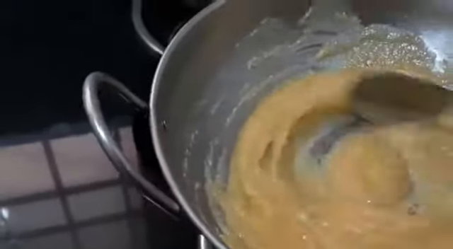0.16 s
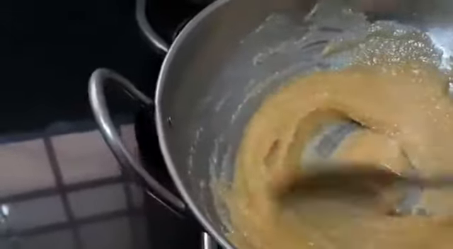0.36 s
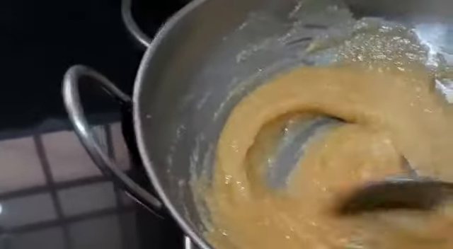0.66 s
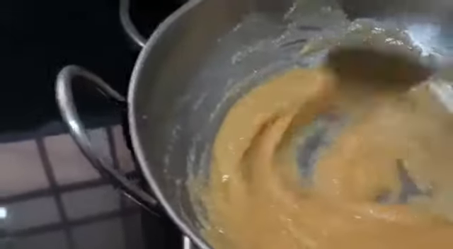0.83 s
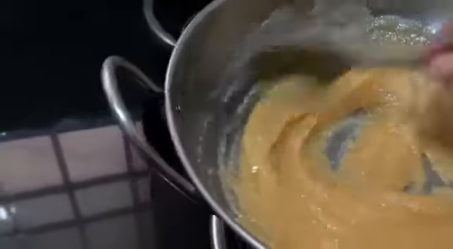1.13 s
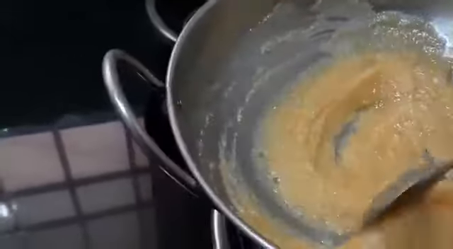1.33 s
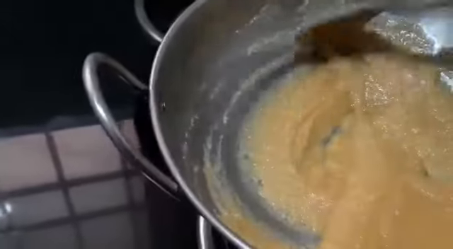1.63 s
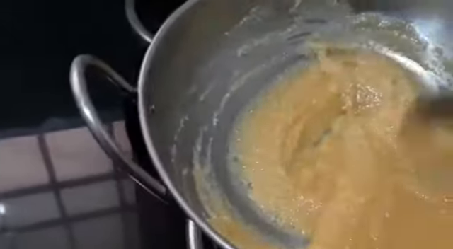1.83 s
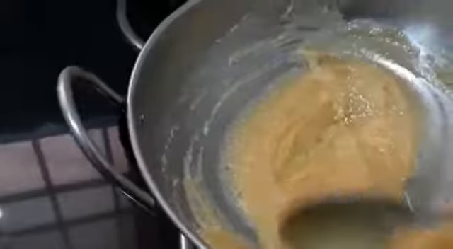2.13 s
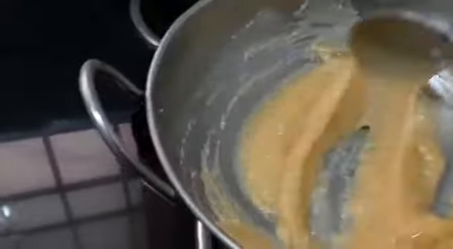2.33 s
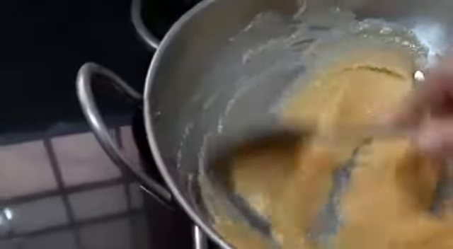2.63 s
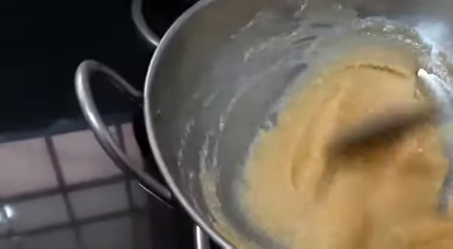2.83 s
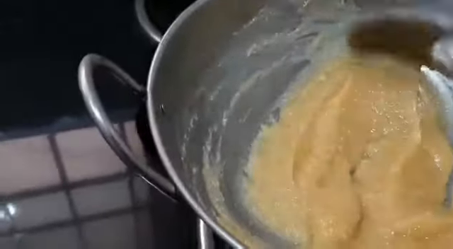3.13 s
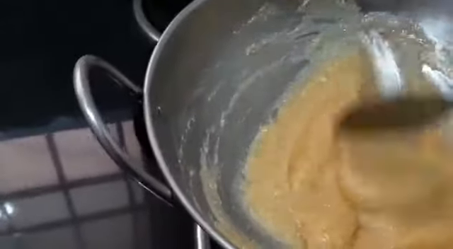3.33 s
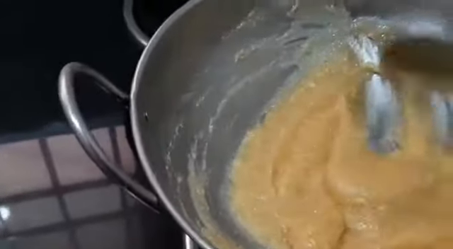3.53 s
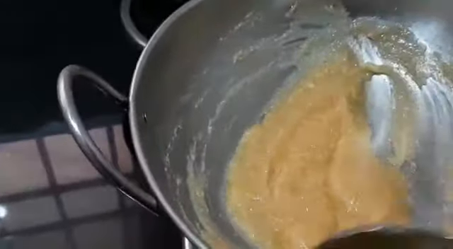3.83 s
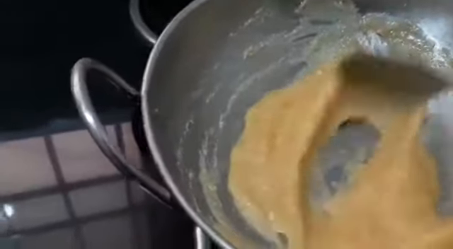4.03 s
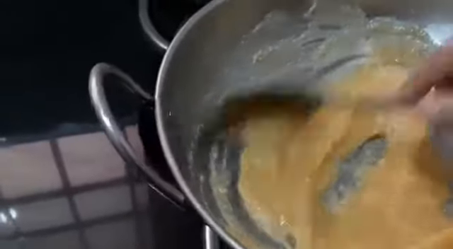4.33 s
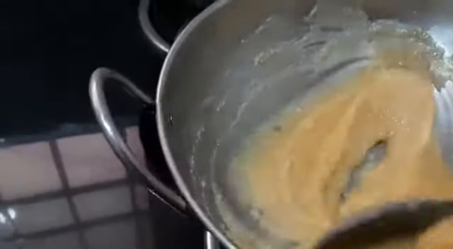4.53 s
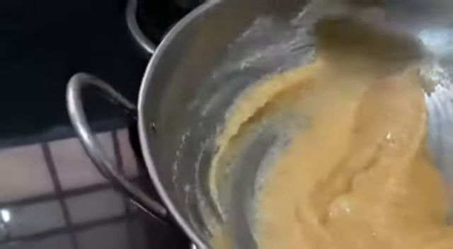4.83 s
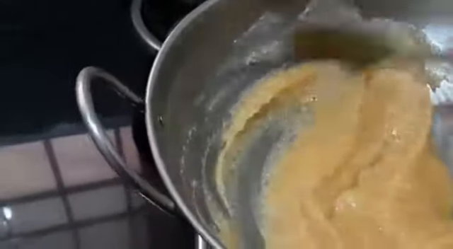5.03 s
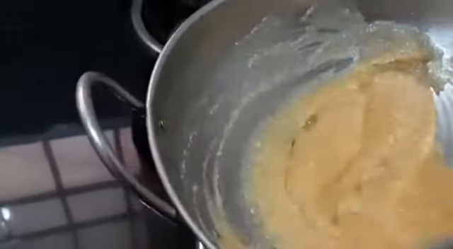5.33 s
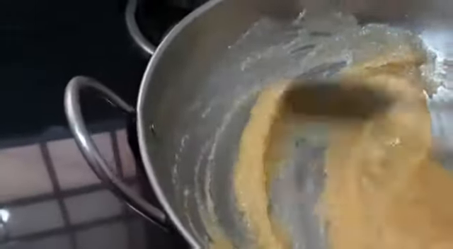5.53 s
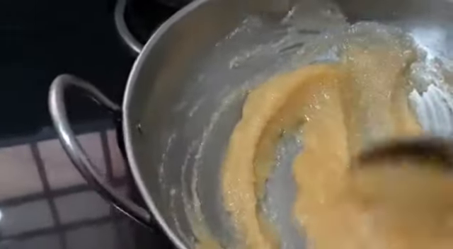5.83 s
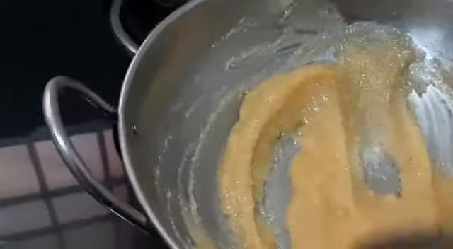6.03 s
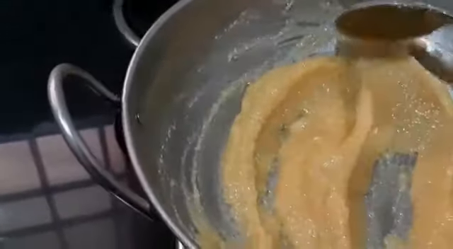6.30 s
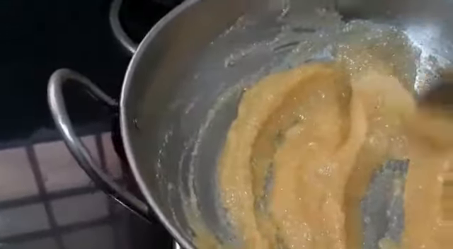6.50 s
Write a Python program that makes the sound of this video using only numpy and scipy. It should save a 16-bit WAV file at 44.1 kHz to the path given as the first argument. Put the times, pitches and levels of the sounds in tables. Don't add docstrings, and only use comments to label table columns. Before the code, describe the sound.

In a hard-walled kitchen, a handheld microphone sits close to a steel pan of thick paste. From 0 to 0.8 seconds a metal spoon scrapes the damped wall in overlapping strokes, gritty hiss over coarse grinding. A soft clack comes at 1.0, then light rubbing, a thin wet slide of paste from about 1.3 to 1.6, and a knock at 1.6. A much harder clack at 2.1 rings the bowl and jolts the microphone. Landings continue at about 2.4, 3.1, 3.5, 3.9, 4.2, 4.6, 5.0, 5.4, 5.7, 6.0 and 6.35, strong ones bright and metallic, weak ones dull and barely heard. Hard ones skid on in a short rasp and shudder the pan on its grate; brief scrapes fill the gaps, the last near 6.5. Low hand bumps surface around 3 and 4.7 seconds. Short echoes and a half-second room tail surround everything, over faint hiss.

```python
import sys
import numpy as np
from scipy import signal
from scipy.fft import rfft, irfft
from scipy.io import wavfile
from scipy.ndimage import uniform_filter1d

SR = 44100
rng = np.random.default_rng(int(sys.argv[2]) if len(sys.argv) > 2 else 0)


def inscribe(sig):
    pcm = np.round(np.clip(np.atleast_2d(sig).T, -1, 1) * 32767)
    wavfile.write(sys.argv[1], SR, pcm.astype(np.int16))


def invert_db(level):
    return 10 ** (np.asarray(level, dtype=float) / 20)


N = 293706
TIME_S = np.arange(N) / SR

# start_s, peak_db, dull_knock_db, bright_tick_db, bowl_pitch_hz
LANDINGS = [(1.005, -28.5, -7.5, -25, 1625), (1.616, -23, -6, -18, 2800), (2.104, -14, -9, -5.5, 2460),
            (2.435, -26.5, 0, -12.5, 1550), (3.055, -25, -9.5, -22, 1790), (3.47, -13.5, -8, -15, 1670),
            (3.869, -12.5, -8.5, -3.5, 2460), (4.198, -41, -2, -9, 1530), (4.621, -9.5, -19.5, -15, 1850),
            (4.963, -35, -24, -29, 1530), (5.388, -10, -19, -5.5, 2640), (5.691, -47.5, 14.5, -11, 1490),
            (6.001, -40.5, -5, -22, 1550), (6.016, -10.5, -13, -4, 2790),
            (6.351, -15.5, -12.5, -30.5, 1820)]
# start_s, peak_db
LIGHT_TICKS = [
    (2.987, -69),
    (5.975, -70),
]
# pitch_hz, level_db, t60_s
SPOON_MODES = [(5230, -13, 0.033), (5870, 10.5, 0.0012), (7000, -25, 0.0089), (8830, -2, 0.0095),
               (10830, -6, 0.011)]
# multiple_of_bowl_pitch, level_db_per_hz
BOWL_CLACK = [(0.099, -48.5), (.4, -22.5), (0.651, -5.5), (1.002, 8), (1.25, -3.5), (1.7, -9.5),
              (2.6, -25.5)]
# pitch_hz, level_db_per_hz
EDGE_TICK = [(1880, -4), (3200, -19), (3650, -8), (5210, -3.5), (7240, -2), (8600, -0.5), (14700, -9.5),
             (15700, -9.5), (16500, -100)]
# pitch_hz, level_db_per_hz
DULL_KNOCK = [(200, -34), (450, 1), (900, 1), (1600, -2.5), (2200, -7.5), (3500, -45)]


def knocks():
    near, sent = np.zeros(N + SR), np.zeros(N + SR)
    t = np.arange(3000) / SR
    click = 1. * (t == 0)
    blows = [(*row, -1.5 + 0.24 * row[1]) for row in LANDINGS]
    blows += [(*row, -30, 10.5, 6500, -10) for row in LIGHT_TICKS]
    for start_s, peak_db, dull_db, tick_db, bowl_hz, send_db in blows:
        level_spread, pitch_spread = rng.standard_normal((2, len(SPOON_MODES)))
        metal = [(hz, db + 2.0 * u, t60) for (hz, db, t60), u in zip(SPOON_MODES, level_spread)]
        bowl_clack = [(multiple * bowl_hz, db) for multiple, db in BOWL_CLACK]
        blow = invert_db(tick_db - 1) * ring(metal, t, 1 + .03 * pitch_spread)
        blow += ring([(bowl_hz, -18, .025)], t, [1])
        blow += invert_db(9.5) * colour(click, bowl_clack)
        blow += invert_db(tick_db + 20) * colour(click, [(300, -63.0)] + list(EDGE_TICK))
        blow += invert_db(dull_db + 17) * colour(click, DULL_KNOCK)
        chatter = rng.standard_normal(200) * invert_db(-20 - 60 * t[:200] / 0.0063)
        contacts = np.cumsum(rng.integers(5, 36, 5))
        chatter[contacts] = rng.choice([-1, 1], 5) * invert_db(np.array([-4, 2, -7, -9, -12]))
        at = round((start_s - .0008) * SR)
        near_gain = invert_db(peak_db - 1.5 + 0.1349 * peak_db)
        near[at:at + 3000] += near_gain * signal.oaconvolve(blow, chatter)[:3000]
        sent[at:at + 3000] += invert_db(peak_db + send_db) * blow
    return near[:N], sent[:N]


# hardest_moment_s, pressure_db, rise_s, fall_s, bite_into_bare_steel_db
PUSHES = [(0.0, -31, .05, 0.21, 3.5), (.135, -34, 0.09, .12, 2), (.29, -29.5, 0.15, 0.48, 4.5),
          (.47, -27.5, 0.16, 0.094, 0), (0.637, -30.5, 0.15, 0.039, 3.5), (.72, -37, 0.047, 0.12, 5),
          (0.773, -28, 0.076, 0.026, 3), (1.09, -40.5, 0.06, 0.073, 0.5), (1.26, -33, 0.076, 0.047, 2),
          (1.732, -35.5, .12, 0.19, 1.5), (1.831, -30, 0.026, 0.1, 0), (2.521, -58, 0.12, .15, -3),
          (2.608, -32, 0.11, 0.15, -0.5), (3.155, -38.5, 0.087, 0.082, 2.5), (3.195, -33, 0.1, 0.1, 1.5),
          (3.592, -26.5, 0.078, 0.093, -1), (4.298, -31, 0.13, 0.17, 0.5), (5.02, -38.5, .06, 0.083, 1),
          (5.14, -31, 0.042, 0.023, 1), (5.758, -32.5, 0.06, 0.12, 0), (6.449, -34.5, 0.086, 0.021, -0.5),
          (6.543, -32.5, 0.091, 0.11, -1)]


def pressure():
    return swells(*np.transpose(PUSHES)[:4])


# pitch_hz, width_hz, level_db
PAN_WALL = [(531, 260, -11), (810, 250, -18.5), (4300, 67, -2.5), (5317, 95, -6.5), (6295, 66, -10),
            (6680, 92, -12), (8000, 180, -15.5), (9700, 130, -26.5), (12230, 110, -4)]
# start_s, pitch_hz
EDGE_PLACE = [(0, 1570), (.14, 1706), (0.248, 1300), (.5, 1620), (0.701, 1270), (1.1, 1640), (1.24, 1280),
              (1.7, 1620), (1.849, 1477), (2.6, 1540), (3.131, 1613), (3.6, 1326), (4.3, 1570),
              (5.14, 1370), (5.45, 1480), (5.72, 694), (5.88, 683), (6.051, 1597)]
# pitch_hz, level_db_per_hz
GRIT_HISS = [(1880, -49), (3200, -5), (4420, -2), (4760, -3), (5170, -2.5), (7240, -3.5), (8480, 1),
             (9400, -3.5), (13300, -4), (15900, -10.5), (16500, -55)]
# pitch_hz, level_db_per_hz
GRIT_GRIND = [(240, -36.5), (400, -9.5), (588, -3.5), (1060, -6.5), (1260, -1.5), (1450, -4.5),
              (2200, -4.5), (2860, -13), (4840, -120)]
# pitch_hz, level_db_per_hz
RUBBED_BOWL = [(1120, -26.5), (1900, -1), (2190, -1), (2410, -2.5), (2700, -3.5), (3400, -7.5), (4420, -4),
               (7480, -120)]
# start_s, hiss_db, grind_db, bowl_db
EDGE_SKIDS = [(0.091, -27.5, -36, -28), (0.688, -29, -35, -35), (1.217, -36, -40, -49),
              (1.008, -49.5, -43.5, -48), (1.621, -49, -37.5, -38), (2.11, -25.5, -26.5, -23),
              (2.438, -48.5, -40, -46.5), (3.058, -60, -41.5, -43.5), (3.474, -36.5, -35, -33),
              (3.876, -23.5, -25.5, -22.5), (4.203, -60, -49.5, -48), (4.624, -36, -29.5, -24),
              (4.967, -55, -59, -54), (5.395, -24, -28.5, -22.5), (5.697, -52, -46, -63),
              (6.022, -26.5, -27.5, -23), (6.355, -48, -35.5, -41)]
# fall_s of hiss, grind, bowl
SKID_FALLS = [0.19, .23, 0.17]


def scrape(push):
    slip_size = invert_db(5.1 * np.minimum(rng.exponential(1, N), 4.4))
    slips = slip_size * (rng.random(N) < 3000 / SR) * rng.choice([-1, 1], N)
    grit = evened(evened(slips) + 0.61 * rng.standard_normal(N))
    judder = invert_db(2.2 * drift(60, count=1)[0])
    grit = evened(grit * judder)
    travel = 3.5 * np.array(drift(12, count=len(PAN_WALL)))
    rings = []
    for (hz, width, db), level_db, bend in zip(PAN_WALL, travel, travel[::-1]):
        rings.append(invert_db(db + level_db) * resonate(grit, hz * (1 + 0.0068 * bend), width))

    hiss = evened(colour(grit + invert_db(6.5) * sum(rings[2:]), [(300, -83)] + list(GRIT_HISS)))
    place_hz = np.interp(TIME_S, *np.transpose(EDGE_PLACE))
    moving = invert_db(6.0) * resonate(grit, place_hz, 170)
    grind = evened(colour(grit + invert_db(9.0) * sum(rings[:2]) + moving, GRIT_GRIND))
    bowl = evened(colour(grit, RUBBED_BOWL))

    bite_db = np.interp(TIME_S, *np.transpose(PUSHES)[[0, 4]])
    grind_db = np.minimum(-19.5 - .45 * 20 * np.log10(push), 14.5) + bite_db
    shares = [1, invert_db(grind_db), invert_db(-9.5 + 2.77 * bite_db)]
    start_s, *levels = np.transpose(EDGE_SKIDS)
    rub = np.zeros(N)
    for layer, share, db, fall_s in zip((hiss, grind, bowl), shares, levels, SKID_FALLS):
        skid = swells(start_s, db, .005, fall_s)
        rub += np.hypot(push * share, skid) * layer
    return invert_db(-4) * rub


# start_s, level_db, centre_hz
PASTE_SLIDE = [
    (1.33, -42, 6100),
    (1.556, -43.5, 6000),
    (1.6, -89, 6000),
    (1.61, -65, 5900),
]


def slide():
    start_s, level_db, centre_hz = np.transpose(PASTE_SLIDE)
    s = np.concatenate([[start_s[0] - .012], start_s, [start_s[-1] + 0.026]])
    db = np.interp(TIME_S, s, np.concatenate([[-105.5], level_db, [-105.5]]))
    hz = np.interp(TIME_S, s, np.concatenate([[6000], centre_hz, [6000]]))
    wet = resonate(resonate(rng.standard_normal(N), hz, 1457), hz, 1400)
    return invert_db(db - 14.0) * evened(wet)


# start_s,
# grate_hum_db, pan_body_db, fall_s
PAN_SHAKES = [(0.0, -66, -68, 0.14), (.87, -53, -112, .25), (1.006, -55, -47, 0.36),
              (1.3, -63, -51.5, 0.099), (1.55, -61, -73, 0.18), (1.618, -42.5, -36, 0.28),
              (2.03, -62.5, -83, 0.13), (2.108, -38, -34.5, 0.27), (2.435, -51.5, -40.5, 0.23),
              (2.971, -52, -74, 0.18), (3.057, -47, -40, 0.2), (3.473, -43, -34, 0.34),
              (3.872, -42, -32.5, 0.24), (4.2, -85, -53, 0.42), (4.624, -41, -44.5, 0.28),
              (4.68, -44, -35.5, 0.21), (5.392, -43, -47, .2), (5.44, -43, -38.5, .22),
              (5.694, -57, -45, 0.16), (6.02, -36.5, -35, 0.23), (6.354, -45.5, -35.5, .2)]
# pitch_hz, width_hz, level_db
GRATE_AND_BODY = [(112.6, 9.8, 0), (222.3, 16.5, -7.5), (277.8, 25, -3.5), (318.8, 13.3, -1),
                  (363, 21, -11), (392.5, 84, -9)]


def shake(push):
    start_s, hum_db, body_db, fall_s = np.transpose(PAN_SHAKES)
    hum_lag_s, body_lag_s = 0.022, .008
    hum_gain = invert_db(-72) + invert_db(-40) * push
    hum_gain += swells(start_s + hum_lag_s, hum_db, hum_lag_s, 1.12 * fall_s)
    body_gain = invert_db(-64.5) + invert_db(-31.5) * push
    body_gain += swells(start_s + body_lag_s, body_db, body_lag_s, fall_s)
    common = rng.standard_normal(N)
    ports = []
    for _ in range(2):
        noise = common + 0.21 * rng.standard_normal(N)
        modes = []
        for hz, width, db in GRATE_AND_BODY:
            mode = resonate(resonate(noise, hz, 2 * width), hz, 2 * width)
            modes.append(invert_db(db) * evened(mode))
        hum, *body = modes
        ports.append(hum_gain * evened(hum) + body_gain * evened(sum(body)))
    return np.array(ports)


def worktop(x, echo_db, fade_db):
    out = np.array([np.roll(x, 2), x])
    for share in turns(0.8947):
        taps = np.zeros((2, 400))
        at = np.arange(8) * 40 + 30 + rng.integers(0, 40, (2, 8))
        echoes = invert_db(echo_db - at * fade_db) * rng.choice([-1, 1], at.shape)
        np.put_along_axis(taps, at, echoes, 1)
        out += signal.oaconvolve((share * x)[None], taps, axes=1)[:, :N]
    return out


# pitch_hz, t60_s
KITCHEN_DECAY = [(60, 0.22), (300, 0.65), (1100, 0.29), (2900, 0.45), (7700, 0.31), (16000, 0.24)]


def kitchen(x):
    out = np.zeros((2, N))
    for share in turns(1.4):
        taps = np.zeros((2, SR // 2))
        at = np.arange(100, SR // 2 - 20, 20)
        at = at + rng.integers(0, 20, (2, len(at)))
        np.put_along_axis(taps, at, rng.choice([-1., 1.], at.shape), 1)
        hz, t, z = signal.stft(taps, SR, nperseg=512)
        same = np.clip(read([(100, 0.53), (300, 0.96), (900, 0.16), (5000, 0.093)], hz), 0, 1)[:, None]
        z = np.array([z[0], same * z[0] + np.sqrt(1 - same ** 2) * z[1]])
        decay = invert_db(-60 * t / read(KITCHEN_DECAY, hz)[:, None])
        tail = signal.istft(z * decay, SR, nperseg=512)[1]
        tail = tail * np.clip((np.arange(tail.shape[1]) / SR - .003) / .012, 0, 1)
        tail = tail / np.linalg.norm(tail[0])
        out += signal.fftconvolve((share * x)[None], tail, axes=1)[:, :N]
    return out


# start_s, level_db, rise_s, fall_s
HAND_BUMPS = [
    (.548, -51, .06, 0.028),
    (2.913, -41, .07, 0.042),
    (3.003, -41, 0.16, 0.08),
    (4.648, -30.5, 0.054, 0.067),
    (4.766, -32, 0.085, 0.11),
]
# start_s, peak_db, pitch_hz
MIC_JOLTS = [
    (2.104, 1, 84.4),
    (3.873, -9.5, 115.6),
    (6.02, -15, 111),
]


def handling():
    a, b = rng.standard_normal((2, N))
    ports = np.array([a + 0.23 * b, .5 * b - 0.078 * a])
    low = evened(colour(ports, [(15, -40.0), (40, -6.0), (70, 0.0), (110, -2.0), (200, -18.5), (500, -62.5)]))
    low = low * (invert_db(-68.5) + swells(*np.transpose(HAND_BUMPS)))
    t = np.arange(4000) / SR
    lag = np.array([[0], [1.6]])
    for start_s, db, hz in MIC_JOLTS:
        swing = np.minimum(t / 0.0014, 1) * invert_db(db - 60 * t / 0.021) * np.sin(2 * np.pi * hz * t - lag)
        low[:, round(start_s * SR):][:, :4000] += swing * invert_db(np.array([[3.0], [-8.0]]))
    return low


# pitch_hz, level_db_per_hz
ROOM_AIR = [(18, -25), (30, -26.5), (139, -10.5), (1660, -14.5), (2100, -22.5), (2890, -24.5),
            (3860, -29.5), (4410, -27), (6210, -29), (14500, -32.5), (16500, -34.5)]


def air():
    return invert_db(-64) * evened(colour(rng.standard_normal((2, N)), ROOM_AIR))


def evened(x):
    return x / np.sqrt(np.mean(x ** 2) + 1e-20)


def read(points, hz):
    f, value = np.transpose(points)
    return np.interp(np.log(hz + 1), np.log(f + 1), value)


def colour(x, points):
    db = np.maximum(read(points, abs(np.fft.fftfreq(4096, 1 / SR))), -100)
    log_gain = db * np.log(10) / 20
    taps = np.fft.ifft(np.exp(log_gain - 1j * signal.hilbert(log_gain).imag)).real[:2048]
    taps = taps / np.linalg.norm(taps)
    return signal.oaconvolve(x, taps.reshape((1,) * (x.ndim - 1) + (-1,)))[..., :x.shape[-1]]


def resonate(x, hz, width):
    turn = np.exp(2j * np.pi * np.cumsum(hz * np.ones(len(x))) / SR)
    r = np.exp(-np.pi * width / SR)
    return 2 * (turn * signal.lfilter([1 - r], [1, -r], x / turn)).real


def ring(modes, t, detune):
    return sum(invert_db(db - 60 * t / t60) * np.sin(2 * np.pi * hz * d * t)
               for (hz, db, t60), d in zip(modes, detune))


def drift(per_s, count):
    knots = rng.standard_normal((count, int(N / SR * 60) + 2))
    knots = uniform_filter1d(knots, max(round(60 / per_s), 1), axis=1)
    return [np.interp(np.arange(N) * 60 / SR, np.arange(len(k)), evened(k)) for k in knots]


def turns(rate_hz):
    phase = TIME_S * 2 * np.pi * rate_hz
    return [np.sqrt(2 / 3) * np.cos(phase + k * np.pi / 3) for k in range(3)]


def swells(s, db, rise, fall):
    t = np.arange(0, N / SR + .004, .002)[:, None]
    away = np.where(t < s, (s - t) / np.maximum(rise, 1e-3), (t - s) / np.maximum(fall, 1e-3))
    level = invert_db(db - np.minimum(33 * away ** 1.54, 150))
    power = (level ** 2 * ((t >= s) | (away < 1))).sum(1)
    return np.interp(TIME_S, t[:, 0], np.sqrt(power + 1e-12))


def scene():
    near, sent = knocks()
    push = pressure()
    rub = scrape(push) + slide()
    blows = worktop(invert_db(3) * near, echo_db=-4, fade_db=.07)
    close = worktop(invert_db(-2.5) * rub, echo_db=0.0, fade_db=0.0358)
    wet = kitchen(invert_db(2.5) * sent + invert_db(-2.5) * rub)
    low = shake(push) + handling() + air()
    return blows + close + wet + low


def band_limit(x):
    return signal.sosfilt(signal.butter(12, 16860, fs=SR, output="sos"), x)


# pitch_hz, left_minus_right_db
PORT_LEAN = [(60, -4), (180, 3.5), (550, 0.5), (1650, 2.5), (4970, 3.5), (15000, 3.5)]


def record(dry):
    hz = np.fft.rfftfreq(N, 1 / SR)
    lean = read(PORT_LEAN, hz) / 2
    edges = read([(10, -31.5), (28, -16.5), (50, 0.0), (70, -1.5), (3200, -2.5), (3750, -5.5), (4300, 0.5),
                  (16500, 0), (16900, -48.5), (18000, -68)], hz)
    x = irfft(rfft(dry) * invert_db(np.array([lean, -lean]) + edges), N)
    mix = .89 * np.tanh(x / .89)
    return band_limit(mix)


dry = scene()
out = record(dry)
inscribe(out)
```